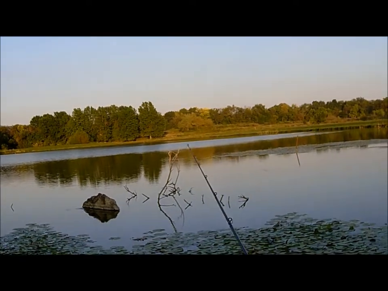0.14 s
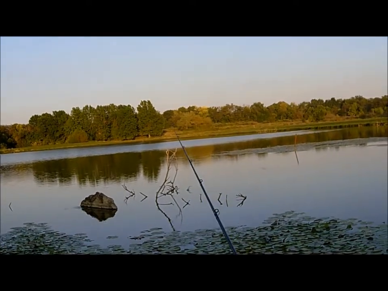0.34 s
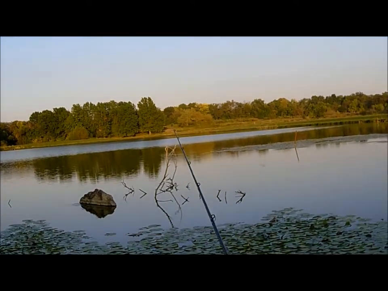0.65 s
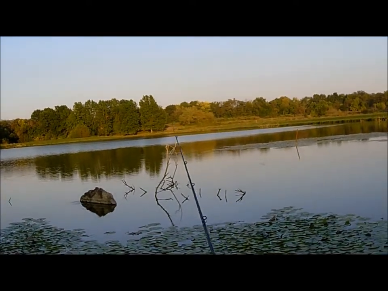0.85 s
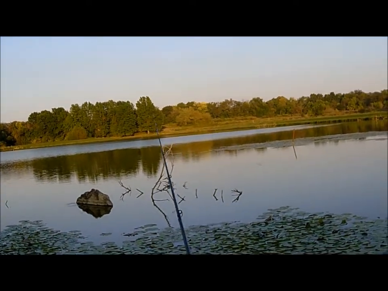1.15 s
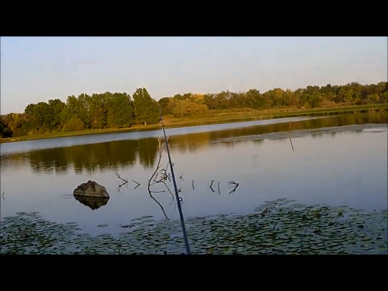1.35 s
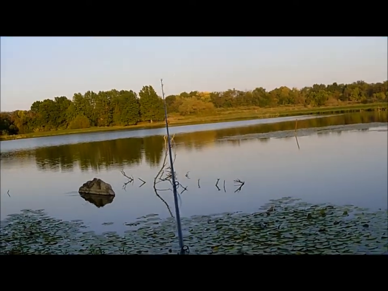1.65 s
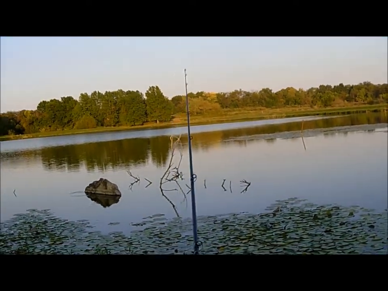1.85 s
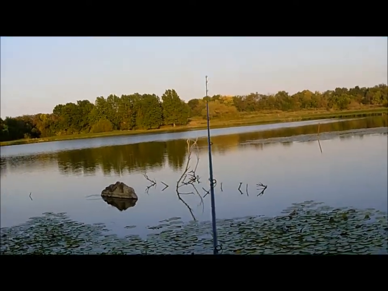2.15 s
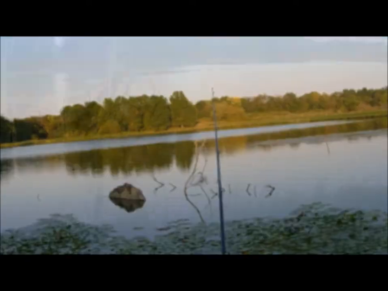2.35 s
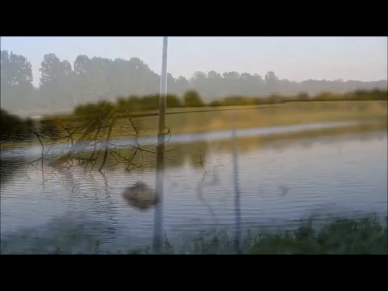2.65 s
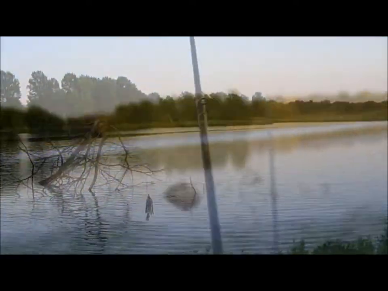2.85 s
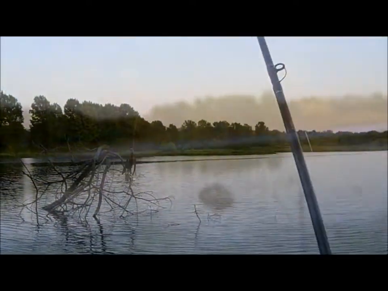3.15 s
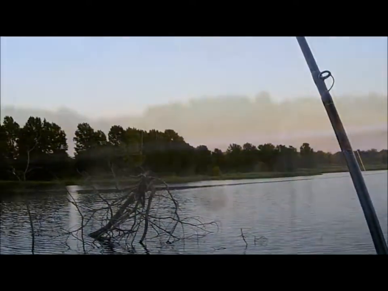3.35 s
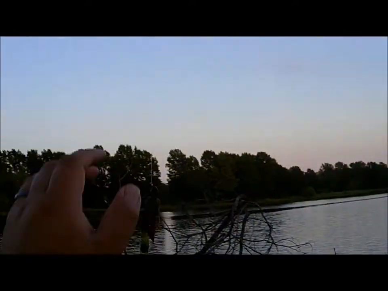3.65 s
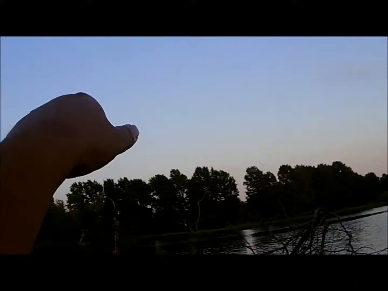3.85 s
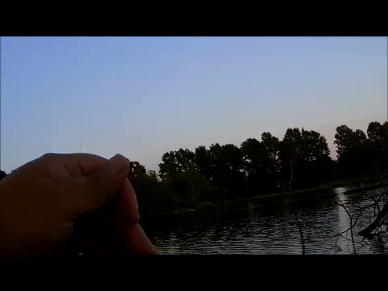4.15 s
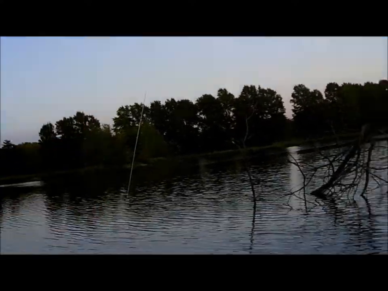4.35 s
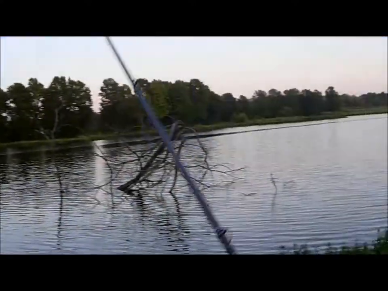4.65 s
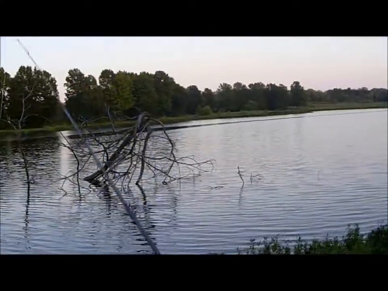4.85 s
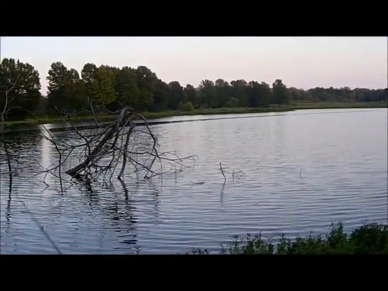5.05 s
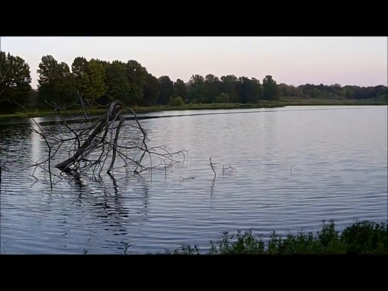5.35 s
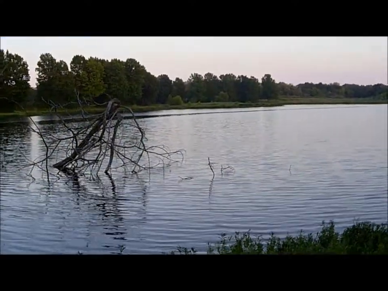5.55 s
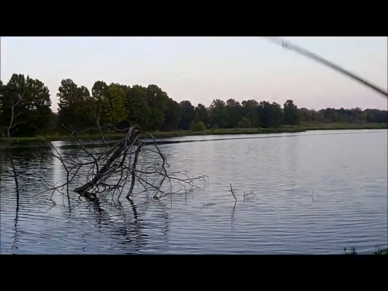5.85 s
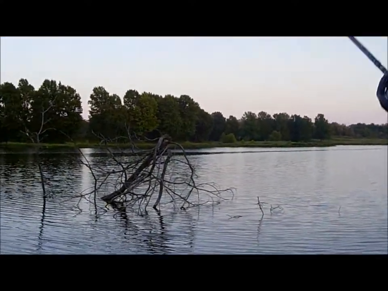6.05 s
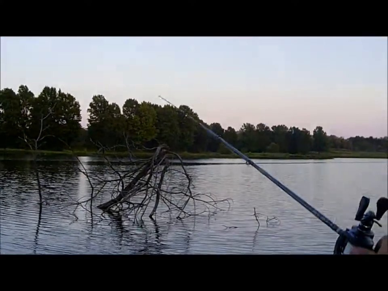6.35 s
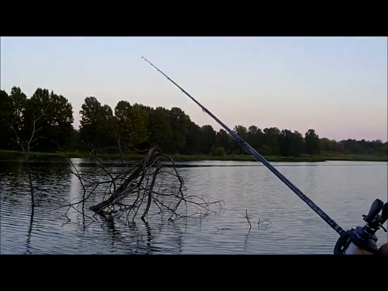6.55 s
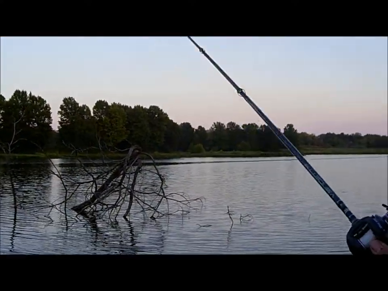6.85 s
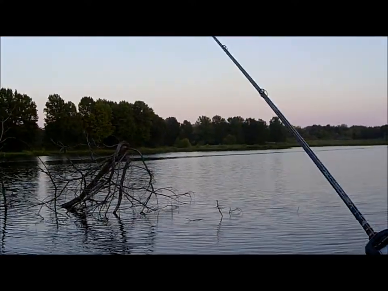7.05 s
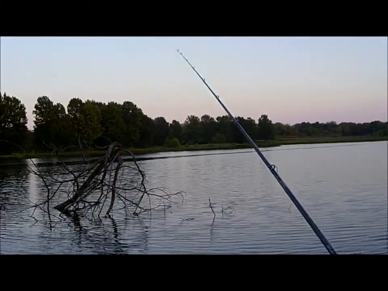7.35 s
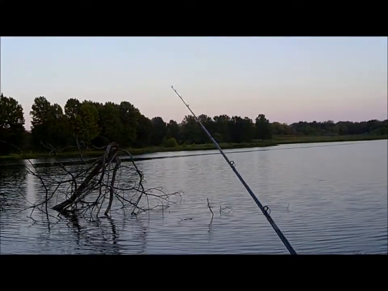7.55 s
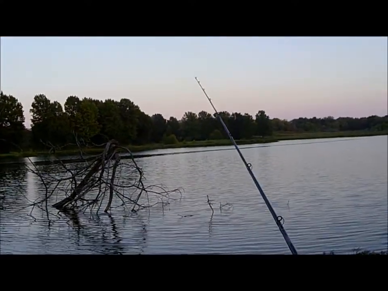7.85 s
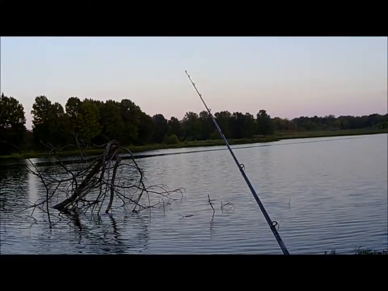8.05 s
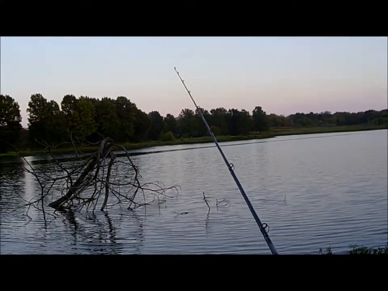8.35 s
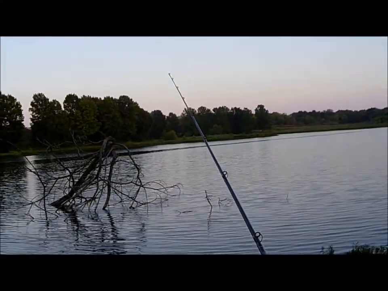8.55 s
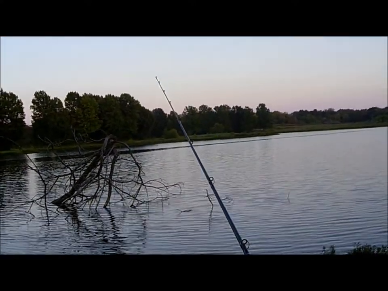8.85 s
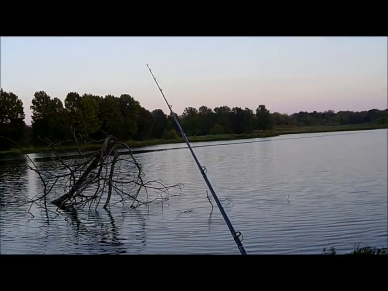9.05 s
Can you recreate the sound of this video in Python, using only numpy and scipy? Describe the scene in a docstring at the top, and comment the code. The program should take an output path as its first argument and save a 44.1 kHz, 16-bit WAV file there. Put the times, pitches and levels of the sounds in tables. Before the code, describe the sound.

Dense high katydid shimmer and a steady cricket trill at an evening pond, with rapid nearby insect rasping and a few tiny fishing reel clicks.

```python
"""Evening at a pond, in two overlapping moments: the first sounds until 3.75 s, the second from 2.25 s.
Throughout, noise rung through wing tones makes katydids, one near with a steady beat; pure tone pulses make
tree crickets in one low band; coloured noise makes low rumble and microphone hiss, with a faint hum and thin insects.
A fishing reel, decaying sines, ticks near 2.2, 3.7 and 4.5 s; a far bird, gliding sines, chirps at 4.3 s.
Lone noise rasps come from 5 to 8 s, a sleeve of soft noise rustles near 6 s, and far katydids buzz from 6.4 s."""
import sys
import numpy as np
from scipy import signal
from scipy.fft import rfft, irfft, next_fast_len
from scipy.io import wavfile
from scipy.ndimage import uniform_filter1d, map_coordinates

SR = 44100
rng = np.random.default_rng(int(sys.argv[2]) if len(sys.argv) > 2 else 0)


def generate_wav(signal):
    """Clip the signal to [-1, 1] and save it as 16-bit WAV at the path in sys.argv[1]."""
    frames = np.transpose(np.atleast_2d(signal))
    scaled = np.clip(frames, -1, 1) * 32767
    pcm = np.round(scaled).astype(np.int16)
    wavfile.write(sys.argv[1], SR, pcm)


N = 406161
T = np.arange(N) / SR  # time of each sample in seconds


def amp(db):
    """Turn a level in dB into a gain."""
    return 10 ** (np.asarray(db) / 20)


def unit(x):
    """Scale x to an average strength (rms) of 1."""
    return x / np.sqrt(np.mean(x ** 2) + 1e-20)


def along(points, hz):
    """Read a curve of (Hz, value) points, joined by straight lines on a log pitch axis."""
    f, v = np.transpose(points)
    return np.interp(np.log(hz + 1), np.log(f + 1), v)


def curves(rows):
    """Join the rows over time: one curve for each column after the time."""
    seconds, *columns = np.transpose(rows)
    return [np.interp(T, seconds, column) for column in columns]


def wobble(rate):
    """A smooth random curve with rate random points a second."""
    return map_coordinates(rng.standard_normal(int(N * rate / SR) + 4), [T * rate])


def filtered(x, response):
    """Multiply the spectrum of x by a response that depends on frequency."""
    m = next_fast_len(N + 8192)
    return irfft(rfft(x, m) * response(np.fft.rfftfreq(m, 1 / SR)), m)[:N]


def patchy_noise(spectrum, patchy_db):
    """Noise of rms 1 with random louder and softer patches in time and pitch, coloured by a spectrum."""
    z = signal.stft(rng.standard_normal(N), nperseg=256)[2]
    patches = uniform_filter1d(rng.standard_normal(z.shape), 6, 0)  # smooth over pitch
    patches = uniform_filter1d(patches, 12, 1)  # smooth over time
    x = signal.istft(z * amp(patchy_db * unit(patches)), nperseg=256)[1][:N]
    return unit(filtered(x, lambda hz: amp(along(spectrum, hz))))


def scrape(wing):
    """Dense uneven tooth strikes ring the wing's resonances, scaled to rms 1."""
    strikes = rng.standard_normal(N) * (rng.random(N) < .5)

    def ring(f):
        # a resonance's response squared: the wing rings twice over
        return sum(amp(db) * (f * w) ** 2 / ((c * c - f * f) ** 2 + (f * w) ** 2) for c, w, db in wing)

    return unit(filtered(strikes, ring))


def rumble_and_hiss(floor, floor_db):
    """Low rumble and microphone hiss: patchy coloured noise whose level drifts slowly."""
    return amp(floor_db + 0.4 * wobble(2)) * patchy_noise(floor, patchy_db=.5)


def hum():
    """A faint low sine that wavers in level and phase."""
    # Each row: pitch in Hz, middle level in dB.
    hum_tones = [(59.2, -76)]
    out = np.zeros(N)
    for hz, db in hum_tones:
        level = np.sqrt(2) * amp(db + 2.8 * wobble(4.5))
        out += level * np.sin(2 * np.pi * hz * T + 1.1 * wobble(5))
    return out


def thin_singers():
    """Far insects that each scrape one narrow wing tone, wavering in level."""
    # Each row: start in seconds, end in seconds, wing tone in Hz, its width in Hz, middle level in dB.
    thin_bands = [(0, 3.75, 6600, 300, -78), (3.85, 4.2, 4950, 250, -78.5), (5.05, 5.5, 4950, 250, -78),
                  (7.5, 8.9, 4950, 300, -79.5), (2.25, 9.3, 7000, 350, -79)]
    out = np.zeros(N)
    for start, end, hz, width, db in thin_bands:
        gate = np.clip(np.minimum(T - start, end - T) / 0.011, 0, 1)
        out += gate * amp(db + 2.4 * wobble(10)) * scrape([(hz, width, 0)])
    return out


def bird():
    """Short faint sine whistles whose pitch arches up and down."""
    # Each row: middle in seconds, top pitch in Hz, level in dB.
    chirps = [(4.242, 4150, -71), (4.288, 4300, -71), (4.344, 4300, -67)]
    half_s, arch_hz = .007, 110  # half length; drop in pitch one half length from the middle
    out = np.zeros(N)
    for s, hz, db in chirps:
        u = np.clip((T - s) / half_s, -4, 4)
        swell = np.exp(-u ** 2 / 2) * (np.abs(u) < 4)
        turns = half_s * (hz * u - arch_hz * u ** 3 / 3)  # its slope is the arched pitch
        out += amp(db) * swell * np.sin(2 * np.pi * turns)
    return np.sqrt(2) * out


def sleeve():
    """Cloth brushes past: patchy noise in short swells."""
    # Each row: middle in seconds, half length in seconds, peak level in dB.
    rustles = [(5.937, 0.082, -62.5), (6.166, .04, -64)]
    # Colour of the cloth noise. Each row: frequency in Hz, relative level in dB.
    cloth = [(600, -37), (1500, -3), (2100, 4), (4400, -10), (5400, -9), (12000, -60)]
    brush = sum(amp(db) * np.exp(-.5 * ((T - s) / half) ** 2) for s, half, db in rustles)
    return brush * patchy_noise(cloth, patchy_db=1)


def reel():
    """Each reel tick is a blow and a harder bounce that set the reel's decaying tones ringing."""
    # Each row: start in seconds, gain in dB, seconds until the bounce, pitch in Hz that the blow favours,
    # loss in dB of tones one octave from that pitch.
    ticks = [(2.232, -32, 0.00171, 1500, 0), (3.718, -34, 0.00199, 2300, 1), (4.495, -41.5, 0.002, 2100, 8)]
    # Tones of the reel. Each row: pitch in Hz, relative level in dB, seconds to fade by 60 dB.
    reel_tones = [(500, -1, 0.01), (1034, -0.5, .012), (2120, -2, 0.0085), (2870, 3, 0.0063),
                  (3770, -1.5, 0.011), (4400, -2.5, 0.0052), (6030, -3, 0.0045), (7200, -9, 0.0049)]
    out, t = np.zeros(N), np.arange(SR // 20) / SR
    for s, db, bounce, focus_hz, fall_db in ticks:
        for delay, gain in ((0, .6), (bounce, 1)):
            ring = np.zeros(len(t))
            for hz, level, t60 in reel_tones:
                tone_db = level - fall_db * np.log2(hz / focus_hz) ** 2 + rng.normal(0, 0.78)
                ring += amp(tone_db - 60 * t / t60) * np.sin(2 * np.pi * hz * t)
            dull_crack = uniform_filter1d(rng.standard_normal(len(t)), size=7)
            ring += 1.6 * amp(-60 * t / 0.0063) * dull_crack
            onset = 1 - np.exp(-t / 0.00054)
            out[round((s + delay) * SR):][:len(t)] += gain * amp(db) * ring * onset
    return out


def rasps(rise_s=0.015, fall_s=0.0086):
    """Another katydid's lone slow rasps swell and break off, each with its own mix of two wing sounds."""
    # Each row: peak in seconds, level in dB, share of the low wing sound in the power from 0 to 1.
    lone_rasps = [(4.996, -51, 0), (5.031, -53, .7), (5.17, -55, .6), (5.266, -49.5, .4),
                  (5.358, -48, 0.04), (5.444, -49, 0.5), (5.543, -47, .3), (5.663, -51, 0.26),
                  (5.69, -49.5, .2), (6.516, -51, 0.8), (6.636, -49, .6), (6.767, -48.5, 0.6),
                  (7.116, -47.5, .2), (7.22, -50, .05), (7.331, -47.5, 0), (7.597, -49, .1),
                  (7.918, -54, .05)]
    # Wing resonances. Each row: pitch in Hz, width in Hz, relative level in dB.
    low_wing = [(8300, 2500, -20), (10070, 680, 2)]
    high_wing = [(6500, 3500, -20.5), (11800, 1800, 5), (14200, 3000, -6)]
    low, high = np.zeros(N), np.zeros(N)
    for s, db, share in lone_rasps:
        swell = amp(db) * np.exp(-.5 * ((T - s) / np.where(T < s, rise_s, fall_s)) ** 2)
        low += np.sqrt(share) * swell
        high += np.sqrt(1 - share) * swell
    return low * scrape(low_wing) + high * scrape(high_wing)


def far_katydids(far, far_db):
    """Many far katydids blur into patchy noise; a fast buzz in level sets in partway."""
    buzz_from_s, buzz_rise_s, buzz_depth, buzz_hz = 6.4, .4, .17, 59
    buzz_in = np.clip((T - buzz_from_s) / buzz_rise_s, 0, 1)
    buzz = 1 + buzz_depth * buzz_in * np.sin(2 * np.pi * buzz_hz * T)
    return amp(far_db + 0.39 * wobble(12)) * buzz * patchy_noise(far, patchy_db=1.04)


def crickets(trill, span, count=44):
    """Tree crickets: wing pulses of pure tone at fresh phases, 30 to 64 a second, in uneven swells."""
    lo_hz, hi_hz = trill[1][0], trill[-2][0]
    first = round(span[0] * SR)
    t = T[first:round(span[1] * SR)]
    choir = np.zeros(N)
    for k, (place, speed, offset) in enumerate(rng.random((count, 3))):
        hz = lo_hz + (hi_hz - lo_hz) * (k + place) / count
        strokes = (30 + 34 * speed) * (t - t[0]) + offset
        phase = 2 * np.pi * rng.random(640)[strokes.astype(int)]  # a new one for every pulse
        swell_db = np.interp(t, np.arange(200) / 20, rng.normal(0, 2.3, 200))
        tone = np.sin(np.pi * strokes) ** 2 * np.sin(2 * np.pi * hz * t + phase)
        choir[first:][:len(t)] += amp(along(trill, hz) + swell_db) * tone
    return choir / np.std(choir[choir != 0])


def near_katydid(bouts, wing, peak=0.84):
    """Each wing stroke swells slowly and stops fast, at a slightly new strength; the beat slows in a bout."""
    slowing = .2  # strokes per second lost each second
    lead_share = .14  # share of a stroke from its middle to its loudest point
    # a bout starts and ends softer, over these shares of its length
    swell_share, swell_db, fade_share, fade_db = 0.39, 5, 0.43, 4
    song = np.zeros(N)
    for start, end, rate, db in bouts:
        t = np.clip(T - start, -.5 / rate, end - start)
        singing = t == T - start
        count = rate * t - slowing * t ** 2 / 2 + peak - lead_share
        u = count % 1  # place within the stroke
        size_db = rng.normal(0, 0.75, 128)[count.astype(int)]
        rise_and_fall = np.where(u < peak, u / peak, (1 - u) / (1 - peak))
        stroke = np.sqrt(8 / 3) * np.sin(np.pi / 2 * rise_and_fall) ** 2  # rms 1
        done = t / (end - start)
        soft_db = swell_db * np.clip(1 - done / swell_share, 0, 1)
        soft_db += fade_db * np.clip(1 - (1 - done) / fade_share, 0, 1)
        song += singing * stroke * amp(db - soft_db + size_db)
    return song * scrape(wing)


def moment(span, chorus, bouts, wing, far, trill, floor, floor_db):
    """All the singers, the rumble and the hiss of one moment, cut in and out sharply."""
    far_db, trill_db = curves(chorus)
    sound = rumble_and_hiss(floor, floor_db) + far_katydids(far, far_db)
    sound += amp(trill_db) * crickets(trill, span) + near_katydid(bouts, wing)
    cut_in = np.clip((T - span[0]) / .003 + 1, 0, 1)
    cut_out = np.clip((span[1] - T) / .003, 0, 1)
    return sound * cut_in * cut_out


def first_moment():
    """The first moment: the near katydid beats fast and loud over softer crickets."""
    # Start and end of the moment in seconds.
    span = (0, 3.749)
    # Levels over time. Each row: time in seconds, far katydids in dB, crickets in dB.
    chorus = [(0, -47.5, -59), (.5, -46.5, -58), (1, -48, -58.5), (3.75, -45.5, -59)]
    # Near katydid's bouts. Each row: first stroke in seconds, end in seconds,
    # strokes per second at the start, full level in dB.
    bouts = [(-.01, .52, 17.28, -51), (.57, 3.9, 17.17, -48.8)]
    # Its wing resonances. Each row: pitch in Hz, width in Hz, relative level in dB.
    wing = [(7700, 2300, -25), (10300, 1100, -11), (11480, 420, -3), (12000, 1700, -9), (13800, 2700, -18)]
    # Colours of far katydids, crickets, then rumble and hiss. Each row: frequency in Hz, relative level in dB.
    far = [(3530, -53), (6000, -38), (6450, -26), (7010, -19.5), (8840, -9.5), (10200, -1.5), (11400, 0),
           (12800, -2), (15100, -4), (17000, -6.5)]
    trill = [(1470, -51), (2500, -8), (2780, -2.5), (2910, 4), (3020, 1), (3130, 0.5), (3350, -18.5),
             (4360, -57), (7370, -120)]
    floor = [(12, -19), (25, -1), (60, -2.5), (80, -0.5), (130, 0), (300, -1.5), (1000, -12), (1600, -17.5),
             (2300, -20.5), (4000, -25), (6000, -25), (9000, -26), (20000, -56)]
    return moment(span, chorus, bouts, wing, far, trill, floor, floor_db=-53.5)


def second_moment():
    """The second moment: the near katydid beats slower and softer, and the crickets are louder."""
    # The tables have the same columns as in first_moment: span, levels, bouts, wing, then the colours.
    span = (2.25, 9.3)
    chorus = [(2.25, -49.5, -54), (3.3, -49.5, -53), (3.8, -52, -52), (4.15, -51, -52), (5.68, -51, -54.2),
              (5.72, -52.5, -54.5), (6.3, -57, -54), (6.9, -51.5, -54), (8.4, -54.5, -54),
              (9.21, -51.5, -54)]
    bouts = [(2.589, 4.37, 15.78, -50.5), (4.428, 5.3, 15.8, -53.5), (5.734, 6.95, 15.8, -54),
             (7.407, 9.15, 15.67, -55)]
    wing = [(7540, 3000, -23), (10200, 1800, 3), (11920, 1000, 3), (12040, 2000, 4.5), (14200, 6700, -0.5)]
    far = [(3530, -47), (6000, -30), (6930, -20.5), (7810, -13), (9970, -0.5), (11400, 2.5), (12100, 0),
           (14000, -4.5), (17000, -6)]
    trill = [(1350, -47), (2300, -20), (2520, -1.5), (2760, 3), (2920, -2), (3130, -16.5), (3250, -30),
             (4220, -66), (7150, -120)]
    floor = [(12, -36), (25, -6), (60, 2), (80, -2), (130, 0.5), (300, -2.5), (1000, -11.5), (1600, -18.5),
             (2300, -20.5), (4000, -24.5), (6000, -27), (9000, -27), (20000, -60)]
    return moment(span, chorus, bouts, wing, far, trill, floor, floor_db=-53.0)


def scene():
    """Add up the small sounds and both moments."""
    small_sounds = hum() + thin_singers() + bird() + sleeve() + reel() + rasps()
    return (small_sounds + first_moment() + second_moment())[None]


def record(dry):
    """Cut the highest treble: the level falls by 120 dB within 200 Hz above the band limit."""
    top_hz = 15745
    return filtered(dry[0], lambda hz: amp(-120 * np.clip((hz - top_hz) / 200, 0, 1)))[None]


dry = scene()
out = record(dry)
generate_wav(out)
```